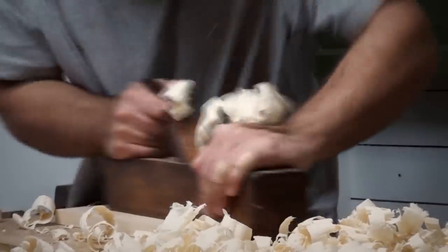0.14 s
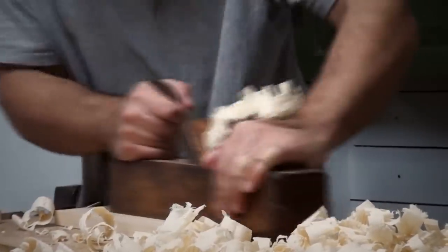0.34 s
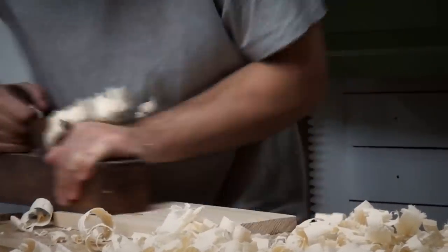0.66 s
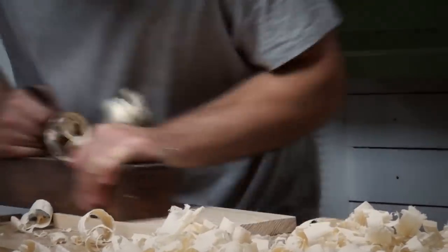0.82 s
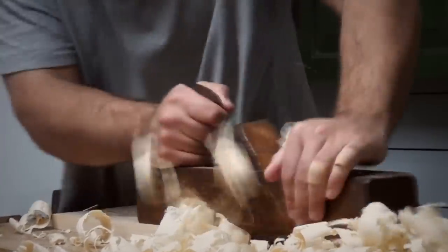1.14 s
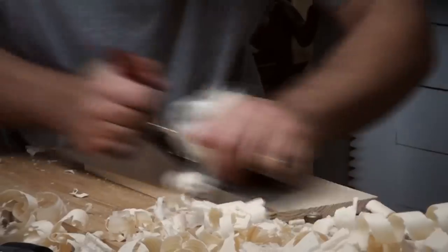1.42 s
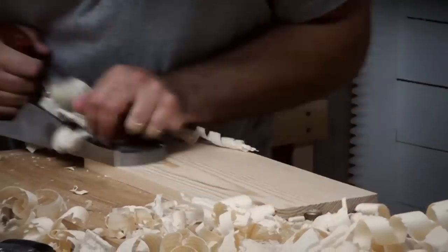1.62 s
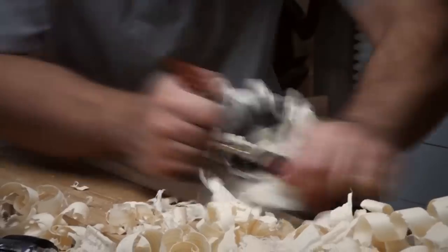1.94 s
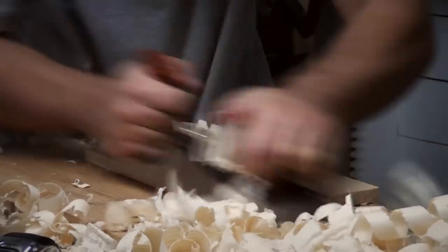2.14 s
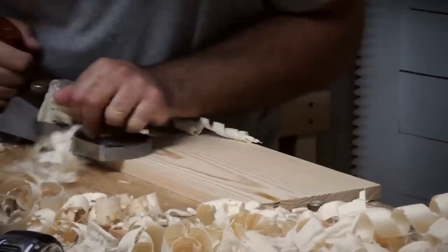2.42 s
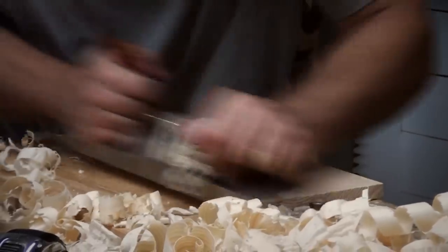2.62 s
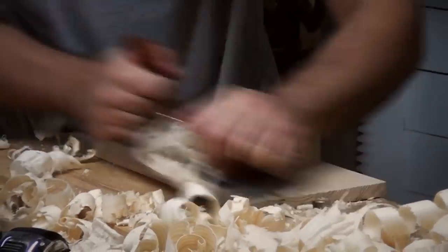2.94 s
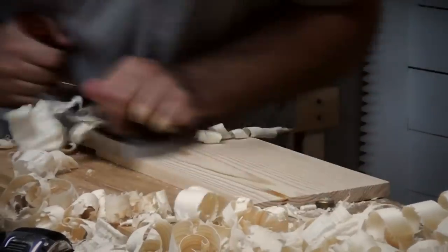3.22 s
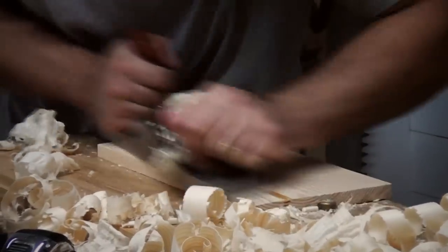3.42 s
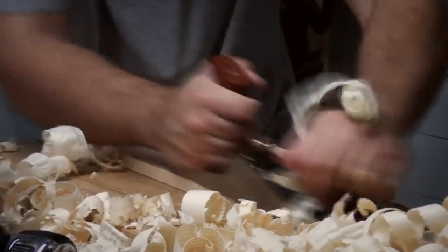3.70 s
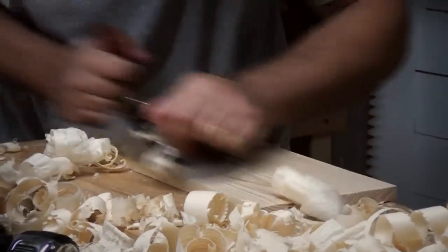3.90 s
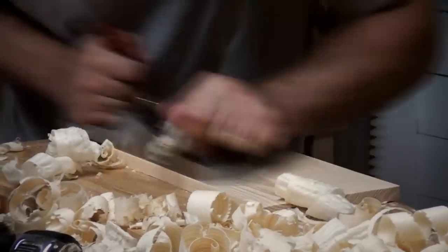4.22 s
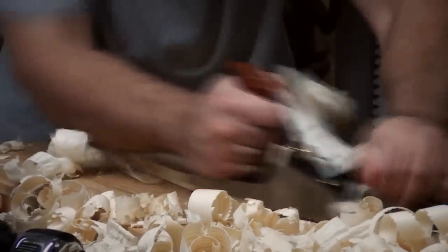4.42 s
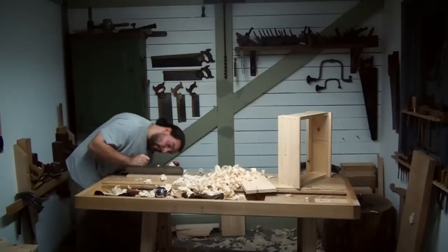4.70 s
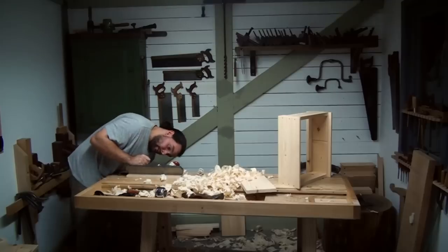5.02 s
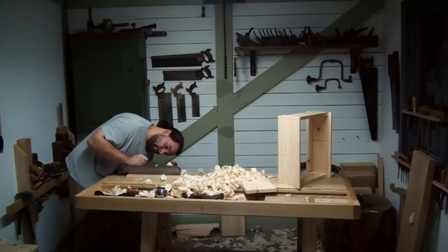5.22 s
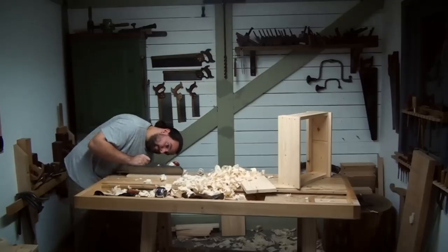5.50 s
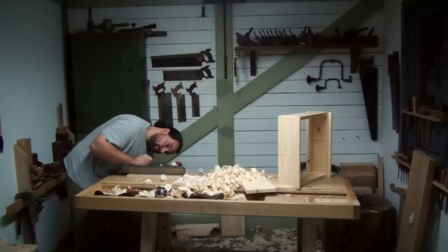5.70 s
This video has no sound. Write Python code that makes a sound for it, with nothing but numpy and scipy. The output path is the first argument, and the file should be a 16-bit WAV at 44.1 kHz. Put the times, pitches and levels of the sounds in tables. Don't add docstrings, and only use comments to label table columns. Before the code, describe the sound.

Close-up hand planing: quick hollow wooden-plane strokes, then bright tearing iron-plane strokes with crackling fibres, before a sudden cut to a nearly silent workshop.

```python
import sys
import numpy as np
from scipy import signal
from scipy.fft import rfft, irfft
from scipy.io import wavfile
from scipy.ndimage import uniform_filter1d, minimum_filter1d

SR = 44100
rng = np.random.default_rng(int(sys.argv[2]) if len(sys.argv) > 2 else 0)


def wrap_up_sound(samples):
    columns = np.atleast_2d(samples).T
    tamed = np.clip(columns, -1, 1)
    steps = np.round(tamed * 32767).astype(np.int16)
    wavfile.write(sys.argv[1], SR, steps)


def volts_from_db(level):
    exponent = np.asarray(level, float) / 20
    return 10 ** exponent


N = 258426
HZ = np.fft.rfftfreq(8192, 1 / SR)

PLACES_S = [
    0,
    1.303,
    4.6235,
    5.87,
]
# (frequency [Hz], level [dB per Hz])
COLOURS = [
    [(88, -29.5), (150, -12), (321, -3), (662, -6), (817, -3.5), (1030, -1.5), (1470, -11.5), (2200, -13),
     (3470, -21), (7870, -23), (10500, -22.5), (14200, -38.5)],
    [(88, -38.5), (150, -6), (266, 1.5), (498, -5.5), (558, -4), (1420, -9), (2370, -5), (2980, -11.5),
     (4800, 0), (5480, 1), (6760, 1.5), (10500, -8.5), (14200, -24)],
    [(88, -48.5), (150, 8), (292, 7), (340, -19), (381, 2), (444, -1.5), (865, -8.5), (1130, -11),
     (1890, -7.5), (2560, -13), (4890, -22.5), (14200, -28.5)],
]
# (frequency [Hz], width [Hz], rise [dB])
WOOD_PLANE = [(363, 67, -4.5), (565, 28, 5.5), (670, 62, 7), (980, 130, -2), (1100, 170, 2.5),
              (1810, 120, 1.5), (2325, 440, 3.5), (2900, 500, 2), (3870, 150, 2.5), (4900, 470, 4.5),
              (6560, 210, 4), (8110, 220, 0)]
IRON_PLANE = [(348, 15, 1.3), (563, 6.2, 1.1), (830, 690, 4.2), (2430, 350, 0.87), (3105, 450, 5.2),
              (3900, 380, 3.2), (4760, 600, 4), (5950, 120, 2.9), (6800, 240, 5.6), (7650, 240, 3.6),
              (8900, 240, 2.2), (10500, 230, 4.1)]
FAR_BENCH = [(280, 55, 7.3), (400, 160, 5.5), (808, 120, 6.7), (1000, 300, 8.7), (2255, 370, 4.3),
             (4990, 310, 1.14)]

# (start [s], rise [s], contact [s], iron level [dB], extra weight on the wood [dB])
WOOD_PUSHES = [
    (-.05, .003, .27, -20, -2.5),
    (0.8677, 0.0012, 0.25, -19.5, -4),
]
WOOD_PULLS = [
    (.44, 0.22, 0.24, -25.5, 0.42),
    (.709, 0.0042, 0.024, -30, 0.76),
]
SET_DOWN = [
    (1.3035, .006, .006, -36, -6),
    (1.3135, 0.003, 0.094, -30, 0.0059),
]
IRON_PUSHES = [
    (1.803, 0.0082, 0.19, -15.5, 0.81),
    (2.571, 0.036, 0.18, -17, 2.7),
    (3.328, 0.0015, 0.28, -17.5, 6.1),
    (4.2139, 0.0019, 0.17, -17, 4.2),
]
IRON_PULLS = [
    (1.451, 0.025, 0.2, -18.5, 0.08),
    (2.215, 0.026, 0.22, -20.5, 0.47),
    (2.965, 0.058, 0.24, -21.5, 0),
    (3.85, 0.061, 0.24, -20.5, 0.039),
]
FAR_TAIL = [
    (4.624, .002, 0.0069, -55.5, 0.0028),
]
FAR_SHIFTS = [
    (4.71, 0.032, 0.068, -70.5, 12),
    (4.86, .05, 0.11, -72, -9),
    (5.1, 0.073, 0.13, -77, 4),
    (5.225, 0.0039, 0.17, -64.5, 1.5),
    (5.51, 0.071, 0.16, -62.5, -11),
    (5.66, .03, 0.11, -68.5, -7.5),
]
# (share [dB], swell during contact [dB], fall after it [dB per s])
WOOD_PUSH = [(6, -1, 50), (5.5, 0.5, 112), (0, 2.5, 116.5), (-18, 11, 90.5)]
WOOD_PULL = [(9, 0.006, 190), (7.5, 0.0049, 220), (0, 0.0046, 120), (-14.5, 0.013, 170)]
RESTING = [(11, -6, 200), (-9, -2.5, 51), (0, -9.5, 78), (-2.5, -6.5, 39)]
IRON_PUSH = [(-11, -7, 38), (-6, -8, 63), (-4.5, 4.5, 106), (-6.5, 8.5, 91)]
IRON_PULL = [(-12.5, -3, 35), (-7.5, 1.5, 150), (-1.5, -4, 160), (-5.5, -4.5, 57)]
DYING = [(9.3, 0.0015, 91), (4.9, 0.0045, 140), (1.5, 0, 71), (1.5, 0, 33)]
FAR_SHIFT = [(16.5, -6.5, 125), (4, -1, 300), (0.5, -2, 200), (-7, -8, 115)]
LIFT_DB = [0.9, -0.04, -2, -7.5]

# (start [s], length [s], from [Hz], to [Hz], level [dB])
CHATTER = [(0.065, 0.12, 1850, 2760, -11), (0.612, 0.12, 3650, 3920, -20), (0.708, 0.034, 2340, 2500, -13),
           (1.313, 0.11, 1220, 1200, -25), (1.461, 0.16, 5460, 4600, -19), (1.818, 0.082, 4730, 4960, -12),
           (1.87, 0.087, 5540, 8100, -11.5), (2.24, 0.16, 4600, 5300, -20), (2.57, .05, 3160, 4250, -19),
           (2.666, 0.16, 6450, 7600, -13.5), (3.335, 0.1, 2550, 2350, -11),
           (3.367, 0.11, 3000, 3900, -12.5), (3.441, 0.13, 3930, 4330, -10), (3.53, .17, 4200, 4240, -13.5),
           (3.865, 0.34, 5000, 5000, -25.5), (4.065, 0.029, 3100, 3200, -21.5),
           (4.235, 0.14, 4000, 4700, -11), (4.345, .09, 5700, 9300, -12), (4.47, 0.12, 8200, 7800, -23),
           (4.733, 0.065, 1700, 2100, -50), (5.537, 0.18, 1080, 930, -51), (3.428, .15, 2500, 2450, -21),
           (2.655, 0.12, 2500, 2590, -21.5), (0.52, .08, 1850, 1950, -24), (4.221, .05, 1900, 1750, -23.5),
           (3.646, 0.067, 1300, 1300, -29.5), (4.375, .055, 7000, 8900, -11),
           (4.415, .075, 8300, 7800, -13), (3.33, .08, 4950, 4900, -18.5), (3.47, .14, 4900, 4900, -16.5),
           (4.05, .065, 2050, 2350, -27), (2.6, .13, 4900, 4800, -20), (.705, .06, 2260, 2240, -18),
           (.58, .08, 2150, 2250, -19), (5.56, .16, 2300, 2400, -63), (5.68, .12, 5000, 4900, -70),
           (4.42, .045, 10400, 10600, -18), (1.805, .07, 8750, 8700, -18), (1.06, .06, 4700, 4500, -18),
           (0, .06, 1000, 1700, -14), (1.79, .035, 600, 900, -24)]
SKIP_WIDTHS = [900, 350, 400, 250, 700, 700, 2000, 1500, 1200, 2040, 600, 1700, 1400, 1993, 705, 301, 1100,
               1513, 3180, 690, 742, 300, 400, 400, 250, 150, 900, 2500, 500, 600, 350, 500, 200, 300, 600,
               700, 600, 400, 900, 500, 120]
# (centre [s], reach [s], frequency [Hz], level [dB])
BOARD = [(.08, 0.081, 980, -21.5), (0.231, 0.07, 360, -12.5), (.4, 0.053, 351, -20.5),
         (.565, .03, 672, -12), (0.62, 0.035, 672, -7.5), (.66, .02, 1150, -12.5), (.722, 0.015, 961, -11),
         (.75, 0.02, 520, -14), (.9, 0.02, 1000, -9), (1.049, 0.061, 1042, -18), (1.129, 0.039, 580, -17.5),
         (1.2, 0.11, 581, -20.5), (1.445, 0.02, 449.7, -20.5), (1.285, .015, 520, -22),
         (1.53, 0.02, 900, -24), (1.66, .03, 1150, -27), (1.81, 0.02, 564, -16), (1.97, .02, 566, -21),
         (2.03, 0.04, 566, -19), (2.18, 0.018, 449, -26), (2.279, 0.038, 551, -27.5),
         (2.451, 0.03, 250, -26), (2.64, .025, 223, -25.5), (2.75, 0.022, 566, -19),
         (2.79, 0.015, 669, -21), (2.85, .03, 450, -27.5), (3.17, 0.018, 253, -27), (3.42, 0.05, 500, -26),
         (3.81, 0.021, 580, -22), (4.01, 0.022, 862, -27), (4.08, .025, 694, -24.5),
         (4.16, .012, 788, -24.5), (4.34, 0.018, 560, -20), (4.395, 0.018, 560, -18.5),
         (4.479, 0.029, 400, -22), (4.66, .08, 330, -59), (4.98, 0.14, 360, -55), (5.33, 0.098, 534.4, -70),
         (5.63, 0.058, 960, -60)]
HUM_WIDTHS = [60, 45, 180]
# (time [s], level [dB])
LURCHES = [(0, -33), (.26, -37), (.39, -31), (.53, -26.5), (.75, -26), (.97, -33.5), (1.08, -41),
           (1.2, -40.5), (1.35, -36.5), (1.7, -41.5), (1.88, -35.5), (2.12, -35), (2.27, -57), (2.63, -39),
           (2.8, -42.5), (3.02, -46), (3.24, -47), (3.36, -30.5), (3.72, -47.5), (3.9, -42.5), (4.19, -38),
           (4.27, -33.5), (4.54, -52), (5.27, -75), (5.46, -65)]
# (frequency [Hz], width [Hz], level [dB])
LEGS = [(35, 46, -21.5), (69.5, 14, -9), (150, 20, 7.5), (256, 80, 4.5)]
DEEP_FULL_DB = [-42, -54.5, -69]
# (frequency [Hz], level [dB per Hz])
HUSH = [(15, -69.5), (25, -43.5), (144, -6.5), (297, -4), (701, -15.5), (995, -6), (1850, -23.5),
        (2420, -11.5), (3080, -19.5), (3620, -17.5), (9500, -25.5), (11800, -36.5), (15400, -40)]

# (time [s], peak [dB], ring [Hz], t60 [s])
BITES = [(.8695, -9.5, 7700, 0.071), (.9697, -14, 7500, .03), (1.4525, -8.5, 6500, 0.077),
         (1.468, -12, 5000, 0.091), (1.5444, -9.5, 6830, 0.096), (2.5805, -9.5, 8250, 0.046),
         (.0772, -9.5, 9050, .03), (1.806, -13.5, 8700, 0.038), (2.225, -31, 6800, .05),
         (3.332, -8, 3870, 0.06), (3.333, -3, 8400, 0.032), (3.888, -24.5, 4800, .05),
         (4.2165, -1.5, 4820, 0.054), (4.2165, -2, 7950, 0.056), (.627, -19, 7640, .03),
         (1.075, -19, 10500, 0.036), (3.8896, -13, 6800, .04), (4.44, -9, 10500, 0.065)]
# (time [s], peak [dB], centre [Hz], t60 [s])
SPLINTERS = [(.164, -6, 9000, .015), (.2315, -14, 11500, .012), (.241, -6, 9500, .015),
             (.272, -20, 10000, .012), (.9, -13, 9000, .012), (1.086, -18, 12000, .015),
             (1.3085, -17, 6500, .03), (1.98, -9, 11000, .03), (3.8611, -21, 5000, .03),
             (4.453, -9, 7500, .015), (5.228, -50, 2300, .12)]
# (time [s], peak [dB], ring [Hz], t60 [s])
THUDS = [(.712, -7.5, 930, 0.18), (.8695, -9, 940, 0.088), (1.3155, -9, 900, .12),
         (1.327, -12.5, 900, 0.096), (1.36, -15, 700, .1), (1.381, -14.5, 1200, 0.055),
         (1.735, -24.5, 840, 0.12), (1.788, -16, 576, 0.1), (1.959, -24, 565, .1), (2.007, -17, 750, .08),
         (2.03, -24, 560, 0.093), (2.165, -21, 460, 0.096), (2.277, -20, 550, 0.081),
         (2.508, -19, 830, 0.079), (1.797, -18, 230, .15), (2.625, -18, 330, .15), (3.265, -25, 800, .08),
         (3.312, -21, 700, .1), (3.777, -20, 600, .15), (4.33, -13.5, 563, 0.12), (5.229, -50, 900, 0.093),
         (5.398, -48, 700, 0.075), (5.458, -44, 263, 0.2), (5.78, -52, 400, .1)]
# (time [s], peak [dB], ring [Hz], t60 [s])
KNOCKS = [(0.881, 5, 754, 0.13), (1.733, -10, 820, 0.11), (2.179, -0.5, 414, 0.058),
          (2.508, -12.5, 820, 0.1), (2.624, -28, 471, 0.07), (3.319, -21, 573, 0.098),
          (3.375, -8.5, 550, 0.24), (3.43, -7.5, 600, 0.11), (3.646, 3, 730, 0.015),
          (3.776, -7, 565, 0.084), (4.327, -7, 557, 0.17), (4.462, -3, 359.6, 0.067),
          (5.231, -33.5, 280, 0.071), (5.389, -25, 433, 0.071), (5.459, -37.5, 263, 0.078)]
# (time [s], reach [s], loss [dB], below [Hz])
GLIDES = [(.15, 0.049, -19, 300), (1.62, 0.046, -18, 350), (2.37, 0.044, -14, 452), (2.95, 0.02, -3, 900),
          (3.13, 0.052, -14, 300), (3.62, 0.029, -17, 600), (4.03, .05, -9, 497), (4.44, .02, -7.5, 350),
          (5.52, .03, -2, 1500), (.69, 0.014, -6, 897)]
# (frequency [Hz], t60 [s])
SHOP = [(100, 0.078), (500, 0.47), (2000, 0.33), (6000, 0.15), (14000, 0.11)]


def evened(x):
    return x / np.sqrt(np.mean(x ** 2) + 1e-20)


def read(points, hz):
    f, value = np.transpose(points)
    return np.interp(np.log(hz + 1), np.log(f + 1), value)


def rises(modes):
    return sum(rise / (1 + (2 * (HZ - f) / w) ** 2) for f, w, rise in modes)


def causal(db):
    log_gain = np.maximum(db - db.max(), -100) * np.log(10) / 20
    circle = np.r_[log_gain, log_gain[-2:0:-1]]
    return np.fft.ifft(np.exp(np.conj(signal.hilbert(circle)))).real[:4096]


def resonate(x, hz, width):
    turn = np.exp(2j * np.pi * np.cumsum(hz * np.ones(len(x))) / SR)
    r = np.exp(-np.pi * width / SR)
    return 2 * (turn * signal.lfilter([1 - r], [1, -r], x / turn + 1e-18)).real


def steadied(x):
    span_s, share = .025, .7
    power = abs(uniform_filter1d(evened(x) ** 2, size=round(span_s * SR))) + .02
    return evened(x / power ** (share / 2))


def blotched(x, depth_db):
    z = signal.stft(x, nperseg=512, noverlap=384)[2]
    patches = rng.standard_normal(z.shape)
    for _ in range(2):
        patches = uniform_filter1d(uniform_filter1d(patches, size=4, axis=0), size=16, axis=1)
    gain = volts_from_db(depth_db * np.clip(evened(patches), -2.2, 2))
    return signal.istft(z * gain, nperseg=512, noverlap=384)[1][:len(x)]


def fibres(count, per_s, spread_db, judder_db, judder_s):
    size = volts_from_db(spread_db * np.minimum(rng.exponential(1, count), 3.5)) * rng.standard_normal(count)
    span = int(judder_s * SR) + 1
    judder = evened(uniform_filter1d(uniform_filter1d(rng.standard_normal(count), span), span))
    torn = rng.random(count) < per_s / SR
    return evened(size * torn * volts_from_db(judder_db * judder))


def droning(modes):
    hz = np.fft.rfftfreq(N, 1 / SR)
    gain = sum(volts_from_db(db) / np.sqrt(w) / (1 + (2 * (hz - f) / w) ** 2) for f, w, db in modes)
    return evened(irfft(rfft(rng.standard_normal(N)) * gain, N))


def movement(t, start, rise_s, contact_s, iron_db, weight_db, answers, lag_s):
    onset_db, first_touch, lift_s = -11.5, 0.43, 0.036
    share_db, swell_db, fall = np.transpose(answers)[:, :, None]
    age = t - start
    db = iron_db + share_db + weight_db * np.array([[1], [0.79], [0], [-0.19]])
    rise = np.maximum(rise_s + lag_s * np.array([[1], [1], [0], [0]]), .001)
    db = db + onset_db * np.clip(1 - age / rise, 0, 1)
    db = db + swell_db * np.clip(age / contact_s, 0, 1)
    db = db + np.c_[LIFT_DB] * np.clip((age - contact_s) / lift_s, 0, 1)
    out_of_silence = np.clip(age / (first_touch * rise_s + 1e-4), 0, 1)
    return volts_from_db(db - fall * np.maximum(age - contact_s, 0)) * out_of_silence


def effort():
    lag_s = 0.028
    kinds = [[(WOOD_PUSHES, WOOD_PUSH, 0), (WOOD_PULLS, WOOD_PULL, 0)],
             [(SET_DOWN, RESTING, 0), (IRON_PUSHES, IRON_PUSH, lag_s), (IRON_PULLS, IRON_PULL, lag_s)],
             [(FAR_TAIL, DYING, 0), (FAR_SHIFTS, FAR_SHIFT, 0)]]
    t = np.arange(0, N + 16, 16) / SR
    power = np.zeros((4, len(t)))
    for s0, s1, here in zip(PLACES_S, PLACES_S[1:], kinds):
        now = (t >= s0) & (t < s1)
        for rows, answers, lag in here:
            for row in rows:
                power[:, now] += movement(t[now], *row, answers, lag) ** 2
    return [np.interp(np.arange(N) / SR, t, gain) for gain in np.sqrt(power)]


def planing():
    out, gains = np.zeros(N), effort()
    edges_hz = [170, 1400, 3400, 8000, 30000]
    for place, modes in enumerate((WOOD_PLANE, IRON_PLANE, FAR_BENCH)):
        a, b = (min(round(s * SR), N) for s in PLACES_S[place:place + 2])
        db = read(COLOURS[place], HZ) + rises(modes)
        heavy = blotched(fibres(b - a, 3000, 2.2, 1.1, 0.008), 1.7)
        fine = blotched(fibres(b - a, 15000, 1.2, 0.65, 0.018), 2.2)
        for k, drive in enumerate((heavy, 0.35 * heavy + 1.39 * fine, fine, fine)):
            above = 1 / (1 + (edges_hz[k] / (HZ + 1)) ** 14)
            share = above / (1 + (HZ / edges_hz[k + 1]) ** 14)
            part = signal.oaconvolve(drive, causal(db + 10 * np.log10(share)))[:b - a]
            out[a:b] += gains[k][a:b] * evened(part)
    return out


def chatter():
    taper, fade_db = 0.29, -5
    out = np.zeros(N)
    for (s, length, from_hz, to_hz, db), width in zip(CHATTER, SKIP_WIDTHS):
        skips = fibres(13000, 9000, 2.2, 2.2, .002)[:round(length * SR)]
        hz = np.linspace(from_hz, to_hz, len(skips))
        sung = resonate(resonate(skips, hz, width), hz, width)
        level = volts_from_db(db + fade_db * np.linspace(0, 1, len(hz)) ** 3)
        out[round(s * SR):][:len(hz)] += steadied(sung) * level * signal.windows.tukey(len(hz), taper)
    return volts_from_db(-2.0) * signal.oaconvolve(out, causal(0.6 * rises(IRON_PLANE)))[:N]


def board():
    fade_db = 7.5
    s, reach, hz, db = np.transpose(BOARD)[:, :, None]
    t = np.arange(0, N / SR, .002)
    swells = volts_from_db(db - 8 - fade_db * ((t - s) / reach) ** 2) + 1e-9
    swells = np.where((s < PLACES_S[2]) == (t < PLACES_S[2]), swells, 1e-9)
    now = np.arange(N) / SR
    hz = np.interp(now, t, (hz * swells ** 2).sum(0) / (swells ** 2).sum(0))
    drive = fibres(N, 3000, 1.5, 2.5, .015)
    cuts = [round(s * SR) for s in PLACES_S[1:3]]
    parts = zip(np.split(drive, cuts), np.split(hz, cuts), HUM_WIDTHS)
    hum = np.concatenate([steadied(resonate(resonate(x, f, width), f, width)) for x, f, width in parts])
    return hum * np.interp(now, t, swells.max(0))


def sway_db():
    rise, fall = 180, 200
    s, db = np.transpose(LURCHES)[:, :, None]
    t = np.arange(0, N / SR, .002)
    db = (db - np.maximum(rise * (s - t), fall * (t - s))).max(0)
    return np.interp(np.arange(N) / SR, t, db)


def bench():
    return droning(LEGS) * volts_from_db(sway_db() - 0.5)


def seated(x):
    deep_hz, follow = 360, 0.66
    full_db = np.take(DEEP_FULL_DB, np.searchsorted(PLACES_S[1:3], np.arange(N) / SR))
    size = 2 ** 19
    low_pass = 1 + (np.fft.rfftfreq(size, 1 / SR) / deep_hz) ** 6
    deep = irfft(rfft(x, size) / low_pass, size)[:N]
    return x - deep * (1 - volts_from_db(follow * np.clip(sway_db() - full_db, -25, 0)))


def crackle():
    centre_hz, width_hz, growth = 10000, 3500, 1.7
    edge = effort()[3]
    snaps = fibres(N, 2500, 1.2, 2.0, .006)
    for _ in range(2):
        snaps = resonate(snaps, centre_hz, width_hz)
    return volts_from_db(-14.5) * evened(snaps) * edge * (edge / volts_from_db(-15.5)) ** (growth - 1)


def hush(close_db):
    air = evened(signal.oaconvolve(rng.standard_normal(N), causal(read(HUSH, HZ)))[:N])
    hum = volts_from_db(-70) * droning([(96.9, 12, -12), (360, 130, 0)])
    close = np.arange(N) < PLACES_S[2] * SR
    return volts_from_db(-56 - 12 + close_db * close) * blotched(air, depth_db=3.5) + hum


def blows(rows, damping, rise_s):
    out, t = np.zeros(N + SR), np.arange(12000) / SR
    for s, db, hz, t60 in rows:
        burst = resonate(rng.standard_normal(len(t)), hz, damping * hz)
        burst = resonate(burst, hz, 4.5 * damping * hz)
        shape = volts_from_db(db - 60 * t / max(t60, .005)) * np.minimum(t / rise_s, 1)
        out[round(s * SR):][:len(t)] += .5 * evened(burst) * shape
    return out[:N]


def bites():
    return blows(BITES, damping=0.065, rise_s=0.00072)


def splinters():
    return blows(SPLINTERS, damping=.3, rise_s=.0004)


def thuds():
    return blows(THUDS, damping=.3, rise_s=0.0023)


def knocks():
    return blows(KNOCKS, damping=0.64, rise_s=0.038)


def lightened(x):
    out, t = x.copy(), np.arange(N) / SR
    for s, reach, db, hz in GLIDES:
        deep = signal.sosfiltfilt(signal.butter(2, hz, fs=SR, output="sos"), x)
        out -= deep * (1 - volts_from_db(db * np.exp(-((t - s) / reach) ** 2)))
    return out


def shop(x, wet_db):
    taps = np.zeros(SR)
    at = np.arange(300, SR - 20, 20)
    taps[at + rng.integers(0, 20, len(at))] = rng.choice([-1., 1.], len(at))
    hz, t, z = signal.stft(taps, SR, nperseg=256)
    tail = signal.istft(z * volts_from_db(-60 * t / read(SHOP, hz)[:, None]), SR, nperseg=256)[1]
    tail = tail / np.linalg.norm(tail)
    out = x.copy()
    for s0, s1, db in zip(PLACES_S, PLACES_S[1:], wet_db):
        a, b = round(s0 * SR), min(round(s1 * SR), N)
        out[a:b] += volts_from_db(db) * signal.fftconvolve(x[a:b], tail)[:b - a]
    return out


def scene():
    friction = volts_from_db(-0.5) * seated(planing()) + blotched(chatter(), depth_db=0.9) + board()
    dry = friction + bench() + crackle() + bites() + splinters() + thuds() + knocks()
    heard = lightened(shop(dry, wet_db=[-9, -9, -7]) + hush(close_db=25.5))
    t = np.arange(N) / SR
    half_s, left = .006, .12
    dips = np.prod([np.clip(abs(t - s) / half_s, left, 1) for s in PLACES_S[1:3]], axis=0)
    return (dips * heard)[None]


def band_limit(x):
    return signal.sosfilt(signal.butter(12, 15600, fs=SR, output="sos"), x)


def record(dry):
    knee, top, span = 1.2, .84, 90
    bass_cut = signal.butter(3, 58, "high", fs=SR, output="sos")
    rounded = signal.sosfilt(bass_cut, knee * np.tanh(dry / knee))
    room_left = minimum_filter1d(top / np.maximum(abs(rounded), top), size=span)
    limited = rounded * uniform_filter1d(room_left, size=span)
    edge = signal.firwin(511, 14250, window=("kaiser", 7), fs=SR)
    below = signal.oaconvolve(limited, edge[None], "same")
    treble = signal.sosfilt(signal.butter(6, 8000, "high", fs=SR, output="sos"), limited)
    loud_db = 10 * np.log10(abs(uniform_filter1d(treble ** 2, size=1500)) + 1e-12)
    kept = uniform_filter1d(1. * (loud_db > -56) * (loud_db < -41), size=300)
    return band_limit(below + volts_from_db(-7) * kept * (limited - below))


dry = scene()
out = record(dry)
wrap_up_sound(out)
```